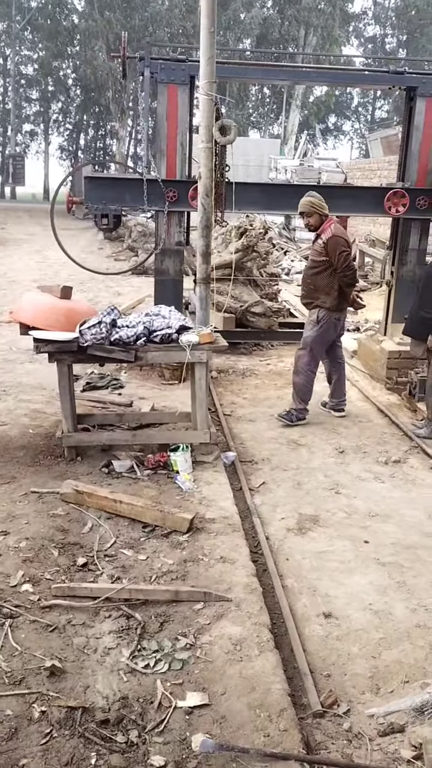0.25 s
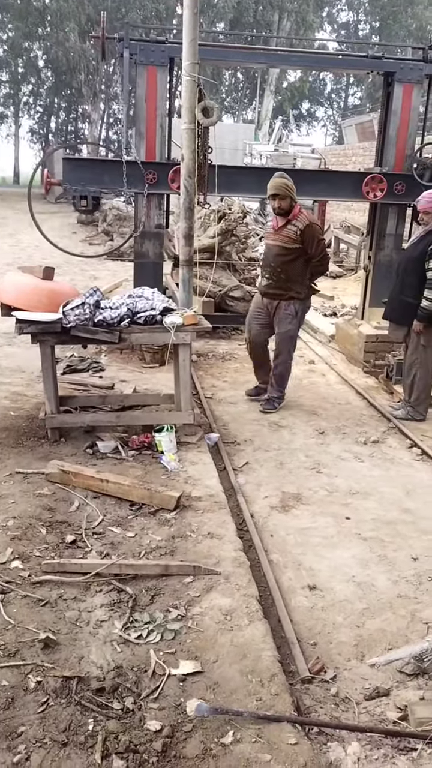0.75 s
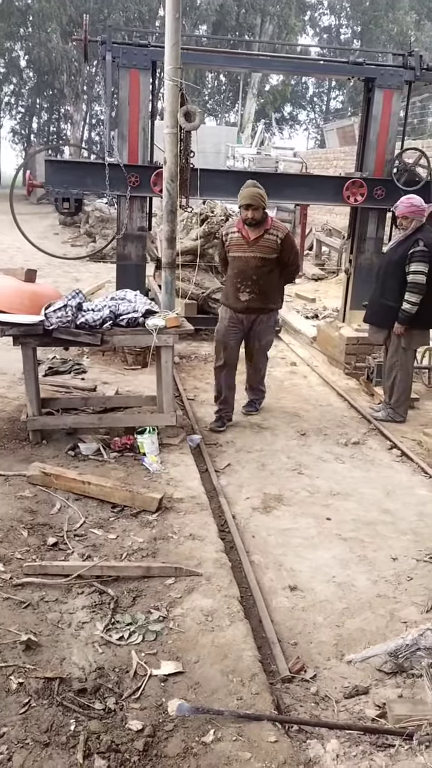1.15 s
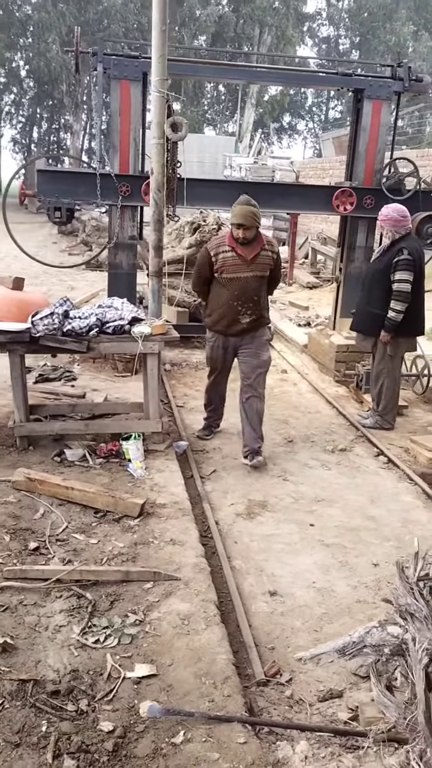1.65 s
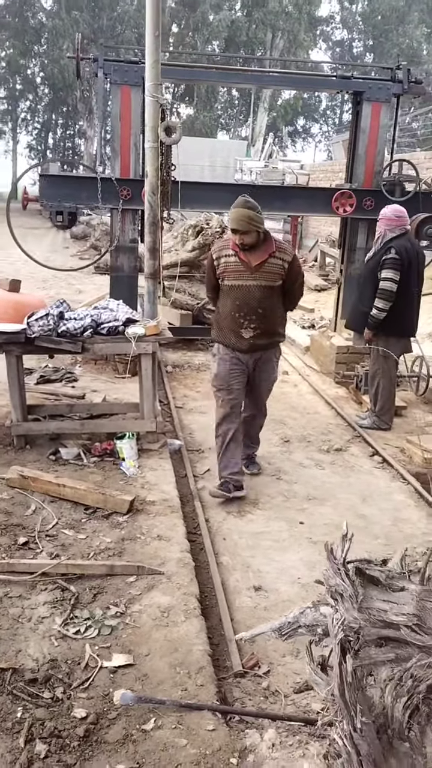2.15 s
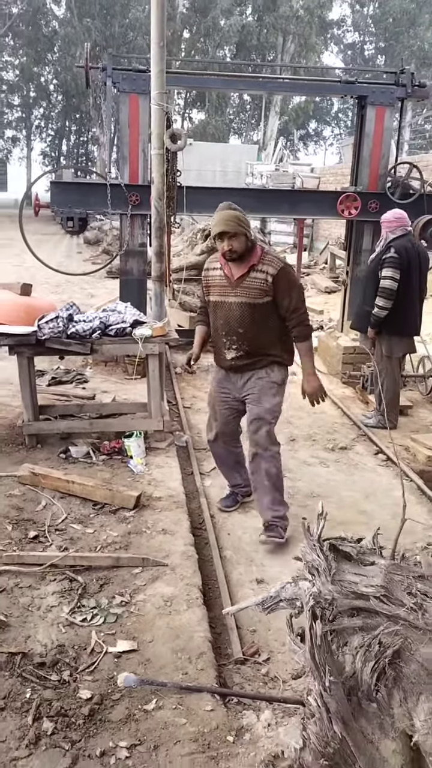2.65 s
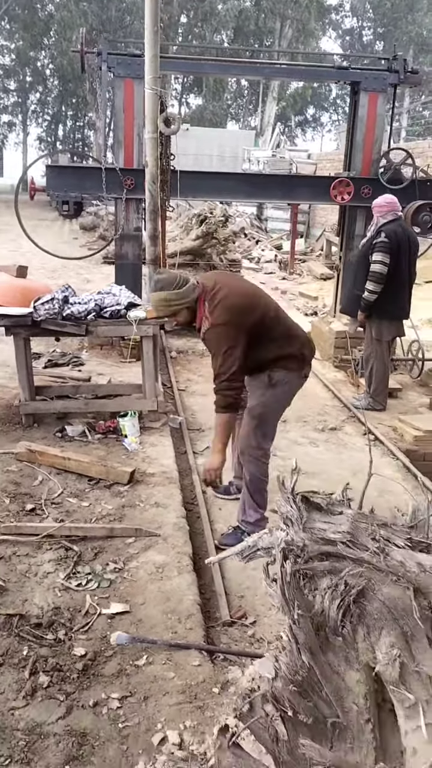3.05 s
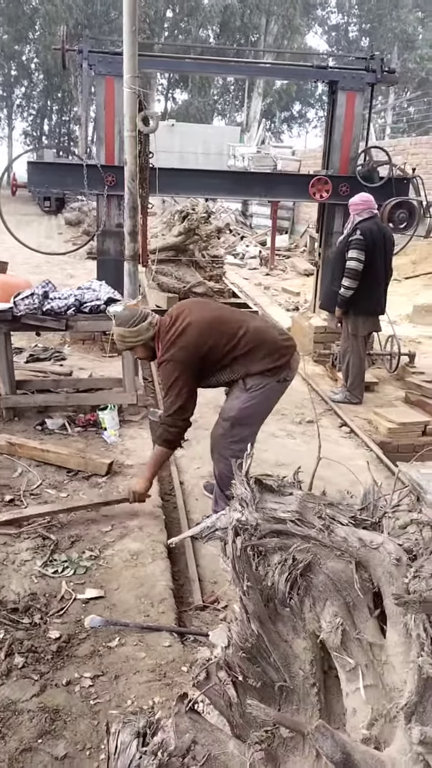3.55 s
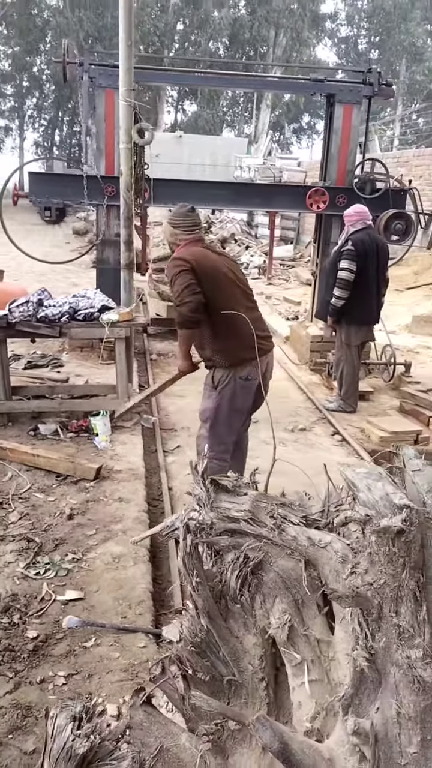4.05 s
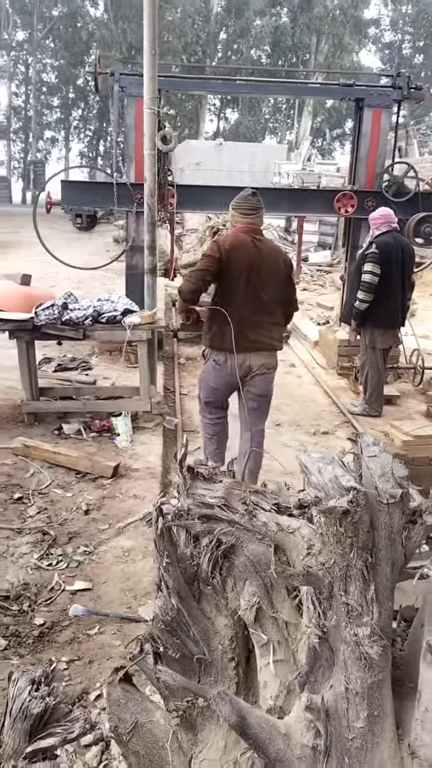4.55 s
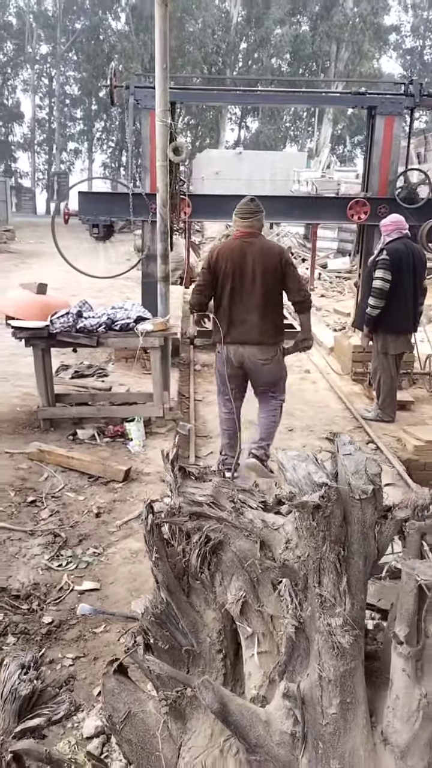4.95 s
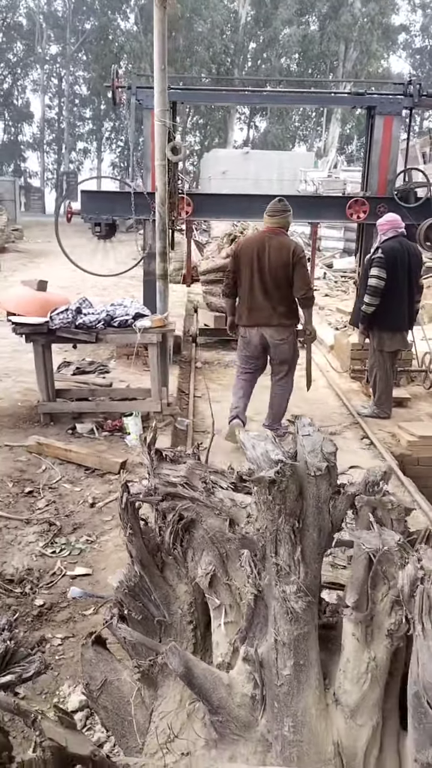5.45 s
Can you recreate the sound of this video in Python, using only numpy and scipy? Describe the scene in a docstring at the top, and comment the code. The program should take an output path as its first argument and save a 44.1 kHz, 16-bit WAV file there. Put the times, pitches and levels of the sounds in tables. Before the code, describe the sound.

Continuous wavering high-pitched screech of a sawmill blade tearing wood outdoors, with groaning metal frame and a slow engine thudding low behind.

```python
"""In an open yard, a horizontal band saw works through a log, mostly to the left of a stereo microphone.
Teeth tear the wood (bands of noise) and shake the blade, which squeals in many wavering modes (noise-driven
resonances). The steel frame whines, groans, rattles and rumbles in the same ways. Behind it a slow
one-cylinder engine thumps through its exhaust pipe (kicks into ringing filters) and a wheel hums (sines)."""
import sys
import numpy as np
from scipy import signal
from scipy.io import wavfile

SR = 44100
rng = np.random.default_rng(int(sys.argv[2]) if len(sys.argv) > 2 else 0)


def log_audio(samples):
    """Write samples as a 16-bit WAV file to the path given in sys.argv[1]."""
    # one column per channel
    frames = np.atleast_2d(samples).T
    # limit to full scale, then quantise
    limited = np.clip(frames, -1, 1)
    pcm = np.round(limited * 32767).astype(np.int16)
    wavfile.write(sys.argv[1], SR, pcm)


N = 250929  # length [samples]


def from_db(db):
    """Turn decibels into an amplitude factor."""
    return 10 ** (np.asarray(db) / 20)


def rms_one(x):
    """Scale a signal to an rms of 1."""
    return x / np.sqrt(np.mean(np.abs(x) ** 2) + 1e-20)


def mid_one(pair):
    """Scale a stereo pair so that the average of left and right has an rms of 1."""
    return pair / np.sqrt(np.mean(pair.mean(axis=0) ** 2) + 1e-20)


def in_time(rows):
    """Draw straight lines between the rows of a table whose first column is time."""
    time_s, *columns = np.transpose(rows)
    return [np.interp(np.arange(N) / SR, time_s, column) for column in columns]


def at_hz(points, hz):
    """Read a (pitch, value) table at any pitch, with straight lines on a log pitch scale."""
    table = np.array(points)
    return np.interp(np.log(hz), np.log(table[:, 0]), table[:, 1])


def drift(rate_hz):
    """Slow random wander with a spread of 1: coarse noise through two one-pole low-passes."""
    step = 40  # samples between coarse points
    r = np.exp(-2 * np.pi * rate_hz * step / SR)
    noise = rng.standard_normal(N // step + 2002)
    slow = signal.lfilter([1], [1, -2 * r, r * r], noise)[2000:]  # drop the filter's start-up
    return np.interp(np.arange(N) / step, np.arange(len(slow)), rms_one(slow))


# How alike left and right are: (pitch [Hz], likeness [0 to 1])
LIKENESS = [(60, 0.99), (180, 0.84), (320, 0.93), (550, 0.38), (1650, 0.064), (4970, 0.015), (15000, 0.039)]
# How much louder left is than right: (pitch [Hz], left minus right [dB])
LEAN = [(60, 0.5), (300, 0.5), (700, 1.5), (1300, 3), (2200, 7.5), (2900, 0.5), (3500, 8), (4100, -0.5),
        (4800, 16), (5600, 5.5), (6400, 16), (7200, -7), (8300, -10), (10000, 2), (15000, -0.5)]


def stereo(mid, side, hz):
    """Mix two unrelated signals so that left and right are as alike and as uneven as at this pitch."""
    alike = np.clip(at_hz(LIKENESS, hz), 0, 1)
    lean_db = at_hz(LEAN, hz)
    pair = np.sqrt(1 + alike) * mid + np.sqrt(1 - alike) * side * [[1], [-1]]
    return pair * from_db([[lean_db / 2], [-lean_db / 2]])


def banded_noise(spectrum, patchy_db, shared):
    """Noise in bands about a third of an octave wide, each with its own flicker on top of a shared one."""
    low_hz, high_hz = spectrum[0][0], min(spectrum[-1][0], .45 * SR)
    edges = np.geomspace(low_hz, high_hz, round(3 * np.log2(high_hz / low_hz)) + 1)
    white = rng.standard_normal((2, 2, N))
    out = 0
    for k, (low, high) in enumerate(zip(edges, edges[1:])):
        band = signal.butter(2, [low, high], "band", fs=SR, output="sos")
        mid, side = signal.sosfilt(band, white[k % 2])  # neighbouring bands use separate noise
        hz = np.sqrt(low * high)
        level_db = at_hz(spectrum, hz) + patchy_db * (shared + drift(12.6))
        out = out + from_db(level_db) * stereo(mid, side, hz)
    return mid_one(out)


MODE_LIKENESS = 0.55  # a single mode reaches both channels at least this much alike


def resonance(hz, width_hz):
    """Noise-driven tone of wandering height and phase, mean square 2 over both channels; hz may move."""
    step = 16  # samples between coarse points
    r = np.exp(-np.pi * np.clip(width_hz, 5, 600) * step / SR)
    draw = rng.standard_normal((2, 2, N // step + 402))
    noise = draw[0] + 1j * draw[1]
    left, other = signal.lfilter([1], [1, -2 * r, r * r], noise)[:, 400:]  # drop the start-up
    centre_hz = np.mean(hz)
    near = np.clip(at_hz(LIKENESS, centre_hz), 0, 1)
    alike = np.clip(max(near, MODE_LIKENESS), 0, 1)
    # each mode has its own phase between left and right
    lag = np.exp(1j * np.pi * (1 - near) * rng.uniform(-0.8, 0.8))
    right = alike * lag * left + np.sqrt(1 - alike ** 2) * other
    carrier = np.exp(2j * np.pi * np.cumsum(np.broadcast_to(hz, N)) / SR)
    at, grid = np.arange(N) / step, np.arange(len(left))
    pair = np.real([np.interp(at, grid, side) * carrier for side in (left, right)])
    lean_db = at_hz(LEAN, centre_hz)
    pair = pair * from_db([[lean_db / 2], [-lean_db / 2]])
    return pair / np.sqrt(np.mean(pair ** 2) / 2)


def small_modes(spectrum, low_hz, high_hz, count, width_share, flicker_db):
    """A crowd of lesser modes spread in pitch, each gliding, flaring up and fading by itself."""
    pitches = np.geomspace(low_hz, high_hz, count) * (1 + .01 * rng.standard_normal(count))
    out = 0
    for hz in pitches:
        level = from_db(at_hz(spectrum, hz) + flicker_db * drift(10.8)) * np.sqrt(hz)
        gliding = hz * (1 + .01 * drift(4.0))
        out = out + level * resonance(gliding, width_share * hz)
    return mid_one(out)


WAVER_SHARE, WAVER_HZ = 0.005, 5.0  # slow wander of a band's pitch: share of the pitch, rate
JITTER_SHARE, JITTER_HZ = 0.004, 16.0  # quick skips of a band's pitch: share of the pitch, rate
FLUTTER_DB, FLUTTER_HZ = 1.3, 22.0  # quick flutter of a band's level, flaring or not


def flaring(bands, flares, base_db, flicker_db, rise_s):
    """Resonant bands that flicker at rest; each flare lifts the nearest band and pulls it to its own pitch."""
    t = np.arange(N) / SR
    nearest = [np.argmin([abs(np.log(hz / band[0])) for band in bands]) for _, _, hz, _ in flares]
    out = 0
    for k, (rest_hz, width_hz, rest_db) in enumerate(bands):
        power = from_db(base_db + rest_db + flicker_db * drift(6.8)) ** 2
        pull = power * rest_hz
        for (middle_s, length_s, hz, db), owner in zip(flares, nearest):
            if owner == k:
                shape = np.clip((length_s / 2 - np.abs(t - middle_s)) / rise_s + .5, 0, 1)
                lift = (from_db(db) * shape) ** 2
                power, pull = power + lift, pull + lift * hz
        wander = WAVER_SHARE * drift(WAVER_HZ) + JITTER_SHARE * drift(JITTER_HZ)
        pitch = pull / power * (1 + wander)  # the louder part decides the pitch
        flutter = from_db(FLUTTER_DB * drift(FLUTTER_HZ))
        out = out + np.sqrt(power) * flutter * resonance(pitch, width_hz)
    return out


WHEEL_HZ = 28.21  # turns per second
# Wheel hum: (multiple of the turning rate, rms level [dB])
WHEEL_ORDERS = [(4, -58), (7, -61), (8, -65)]


def wheel():
    """A turning wheel hums steadily at multiples of its turning rate."""
    turn = 2 * np.pi * WHEEL_HZ * np.arange(N) / SR
    out = 0
    for order, db in WHEEL_ORDERS:
        out = out + np.sqrt(2) * from_db(db) * np.sin(order * turn + rng.uniform(0, 2 * np.pi))
    return out


FIRING_HZ, FIRST_FIRING_S = 7.424, 0.074  # firings per second, time of the first one heard
ENGINE_DB = -52  # rms level
# Thumps of each firing: (delay [s], relative level [dB])
THUMPS = [(0, -2), (0.0306, 0)]
# Ringing modes of the exhaust pipe: (pitch [Hz], relative level [dB], time to fall by 60 dB [s])
EXHAUST = [(68, -9, 0.4), (94, 7, 0.13), (133, 2, 0.14), (163, -1, 0.2)]


def engine():
    """Every firing sends the same few thumps into the exhaust pipe's modes, a little uneven in strength."""
    # one second of run-in comes first and is cut off at the end
    firings = np.arange(-2, N / SR * FIRING_HZ) / FIRING_HZ + FIRST_FIRING_S + 1
    strength = from_db(rng.normal(0, 2.0, len(firings)))
    kicks = np.zeros(N + 2 * SR)
    for delay_s, level_db in THUMPS:
        kicks[np.round((firings + delay_s) * SR).astype(int)] += from_db(level_db) * strength
    soft = signal.butter(2, 300, fs=SR, output="sos")  # low-pass rounds off the kicks
    kicks = signal.sosfilt(soft, kicks + 1e-18)
    out = 0
    for hz, level_db, t60_s in EXHAUST:
        r = from_db(-60 / (t60_s * SR))
        w = 2 * np.pi * hz / SR
        ring = signal.lfilter([0, np.sin(w)], [1, -2 * r * np.cos(w), r * r], kicks)
        out = out + from_db(level_db) * ring
    return from_db(ENGINE_DB) * rms_one(out[SR:SR + N])


# Machine rumble: (time [s], level [dB])
RUMBLE = [(0.0, -45.5), (0.4, -43.5), (1.0, -43.5), (1.6, -42.5), (2.1, -45.5), (2.6, -44), (3.1, -43),
          (3.4, -41.5), (3.9, -41.5), (4.4, -42), (4.9, -40.5), (5.45, -41.5), (5.69, -38)]
# Tone colour of rumble and rattle: (pitch [Hz], relative level per Hz [dB])
MACHINE = [(25, -34), (60, -14), (90, 4.5), (125, 8.5), (160, 2.5), (250, 4.5), (400, 0.5), (600, 0),
           (900, 2.5), (1400, 2), (2000, 0), (2400, 0), (2650, 2), (2900, -6), (3200, -20)]
# Hollow tones of the frame at rest: (pitch [Hz], resonance width [Hz], level [dB])
FRAME_TONES = [(325.8, 78, -53.5), (386, 110, -54), (515.5, 43, -63), (650, 88, -62.5), (1065, 43, -58),
               (1125, 65, -56.5), (1698, 130, -57.5), (1900, 140, -58)]
# A frame tone swells: (middle time [s], length [s], pitch [Hz], level [dB])
SWELLS = [(0.07, 0.17, 653.4, -43), (0.08, 0.19, 1121, -44.5), (0.25, 0.85, 654, -50),
          (0.74, 1.36, 1125, -50), (0.332, 0.24, 1143, -43.5), (0.37, 0.1, 2030, -42.5),
          (0.454, 0.08, 323, -43), (0.617, 0.063, 673, -45), (0.712, 0.3, 388.4, -40),
          (0.776, 0.21, 1123, -40), (0.999, 0.076, 505.5, -41.5), (1.077, 0.066, 500, -38.5),
          (1.02, 0.12, 780, -48), (1.054, 0.29, 430.5, -41.5), (1.048, 0.13, 1697, -43.5),
          (1.107, 0.42, 1125, -45.5), (1.337, 0.0813, 391.7, -40.5), (1.414, 0.13, 1120, -41),
          (1.538, 0.099, 378.3, -42), (1.672, 0.065, 1096, -43.5), (1.714, 0.089, 1650, -40.5),
          (1.8, 0.15, 385, -38), (1.795, 0.086, 321, -42), (1.942, 0.095, 495, -45),
          (1.984, 0.16, 385, -40), (1.973, 0.15, 1115, -43), (2.125, 0.062, 1690, -42),
          (3.089, 0.063, 340, -45.5), (2.406, 0.51, 1686, -46), (2.896, 0.51, 1061, -49.5),
          (3.146, 0.07, 1622, -37.5), (3.218, 0.091, 1659, -42), (3.398, 0.44, 1715, -43.5),
          (3.917, 0.2, 1984, -41), (3.259, 0.15, 330, -46), (4.024, 0.1, 530, -45),
          (4.487, 0.1126, 530, -43.5), (4.735, 0.165, 531.7, -47.5), (5.297, 0.42, 758, -48.5),
          (2.201, 0.31, 762, -50), (3.508, 0.15, 323.8, -46), (3.801, 0.057, 412, -45.5),
          (4.212, 0.063, 319.5, -42.5), (3.82, 0.16, 1117, -42), (3.946, 0.57, 1712, -42.5),
          (4.013, 0.09, 381.6, -48.5), (4.467, 0.29, 1722, -42.5), (4.459, 0.21, 707, -44),
          (4.677, 0.19, 1712, -45.5), (4.506, 0.087, 339.4, -43.5), (4.642, 0.096, 395.3, -40),
          (5.019, 0.086, 334, -47.5), (5.386, 0.06, 364, -43.5), (4.709, 0.091, 1043, -37.5),
          (4.71, 0.12, 1900, -49), (4.883, 0.098, 1138, -39), (5.078, 0.13, 1112, -40.5),
          (5.38, 0.13, 1153, -40.5), (5.621, 0.11, 1190, -45), (5.018, 0.18, 1059, -39),
          (5.188, 0.14, 1836, -40.5), (5.208, 0.86, 1040, -44), (5.21, 1.23, 333.6, -50),
          (5.36, 0.11, 1054, -37.5), (5.476, 0.056, 365.3, -43.5), (5.488, 0.072, 1158, -34.5),
          (5.626, 0.13, 1863, -38.5), (5.666, 0.13, 1065, -39)]
# Steady frame modes: (pitch [Hz], resonance width [Hz], level [dB])
FRAME_MODES = [(264, 14, -61.5), (528.6, 14, -57), (1400, 83, -75), (1917, 45, -57), (2170, 120, -55.5),
               (2390, 92, -53)]
RATTLE_DB = 1.5  # rattle relative to rumble
SWELL_RISE_S = 0.0404  # a swell comes, and goes, within this time


def frame():
    """Shaken steel: groaning tones that swell, steady-pitched modes and a bed of rattle and rumble."""
    rumble_db = in_time(RUMBLE)[0]
    rumble = from_db(rumble_db) * banded_noise(MACHINE, patchy_db=3.0, shared=0.4 * drift(14.0))
    crowd = small_modes(MACHINE, 450, 3150, count=33, width_share=0.04, flicker_db=5.0)
    rattle = from_db(rumble_db + RATTLE_DB) * crowd
    tones = flaring(FRAME_TONES, SWELLS, 0, flicker_db=2.5, rise_s=SWELL_RISE_S)
    steady = 0
    for hz, width_hz, db in FRAME_MODES:
        steady = steady + from_db(db + 3.5 * drift(3.4)) * resonance(hz, width_hz)
    return rumble + rattle + tones + steady


# Thin whines of blade and frame: (start [s], end [s], pitch [Hz], resonance width [Hz], level [dB])
WHINES = [(0.0, 1.75, 3470, 90, -39), (1.9, 3.3, 3519, 45, -41), (2.3, 3.35, 5185, 40, -39),
          (3.3, 5.69, 3530, 50, -45), (3.6, 4.7, 1705, 40, -48), (5.1, 5.69, 1900, 90, -45),
          (2.1, 4.5, 4500, 90, -41), (0.0, 2.1, 4530, 110, -46), (3.3, 5.69, 2375, 50, -50),
          (0.0, 2.0, 2320, 70, -53), (3.4, 4.5, 5250, 50, -40), (3.4, 4.5, 4690, 50, -41),
          (3.0, 5.69, 5569, 14, -45), (2.4, 5.69, 6730, 30, -55), (2.4, 5.69, 7227, 20, -58),
          (2.0, 3.4, 6125, 40, -53)]
WHINE_RISE_S = 0.15  # fade time, centred on each start and end


def whines():
    """Each narrow resonance fades in, holds its pitch while its level flickers, and fades out."""
    t = np.arange(N) / SR
    out = 0
    for start_s, end_s, hz, width_hz, db in WHINES:
        fade = np.clip(np.minimum(t - start_s, end_s - t) / WHINE_RISE_S + .5, 0, 1)
        out = out + from_db(db + 2.5 * drift(6.5)) * fade * resonance(hz, width_hz)
    return out


def squeal(modes, bite):
    """Each blade mode is caught and let go by the wood on its own, and its pitch wavers with blade tension."""
    out = 0
    for hz, width_hz, level_db in modes:
        wavering = hz * (1 + 0.006 * drift(4.0))
        level = from_db(level_db + 2.9 * drift(17.0) + .5 * bite)
        out = out + level * resonance(wavering, width_hz)
    return mid_one(out)


# The cut: (time [s], lower blade modes [dB], upper blade modes [dB], tearing [dB], dust hiss [dB])
CUT = [(0.0, -37, -45.5, -40.5, -55), (0.4, -38.5, -40, -40, -53), (0.95, -35.5, -42.5, -43, -50),
       (1.68, -38.5, -40, -41, -52.5), (1.9, -39.5, -38.5, -37, -47.5), (2.25, -40, -35, -36.5, -45.5),
       (2.5, -41, -35.5, -35.5, -47), (2.75, -49, -32.5, -38, -49), (3.05, -41, -35, -38.5, -46),
       (3.25, -37.5, -36.5, -39, -43), (3.5, -36.5, -33, -38, -41), (3.76, -34.5, -41, -36, -39),
       (3.88, -36, -33, -34.5, -40), (3.98, -40.5, -35.5, -37, -42), (4.25, -49, -30, -37, -46.5),
       (4.4, -36, -35.5, -36.5, -42), (4.55, -42.5, -34.5, -37.5, -46.5), (4.9, -42.5, -30.5, -37.5, -42.5),
       (5.26, -40, -33.5, -35.5, -43), (5.55, -36.5, -38.5, -37.5, -40), (5.69, -32.5, -37, -40.5, -41.5)]
# Lower and upper blade modes: (pitch [Hz], resonance width [Hz], relative level [dB])
LOWER_MODES = [(3265, 520, 21), (3763, 100, 16.5), (3520, 72, 11.5), (3730, 45, 7), (3716, 150, 22),
               (3940, 28, 8)]
UPPER_MODES = [(4210, 130, 21), (4380, 40, 16), (4760, 150, 16), (4890, 130, 20), (5120, 43, 15.3),
               (4620, 68, 14), (5060, 93, 1.6), (5480, 74, 1.9), (5140, 65, 5.3), (5810, 420, 0.5)]
# Tone colour of tearing wood and of flying dust: (pitch [Hz], relative level per Hz [dB])
TEARING = [(1650, -44), (2800, 13.5), (3090, 25), (3480, -35.5), (3970, -4), (4630, -48), (5260, 11.5),
           (6530, 3.5), (7500, -0.5), (8300, -2.5), (9260, -4.5), (10300, -7), (11000, -50)]
DUST = [(8600, -14), (9400, 0.5), (10300, -3), (11700, 2.5), (13000, -7), (14300, -5), (15600, -8)]
# Squealing bands of the blade at rest:
# (pitch [Hz], resonance width [Hz], level against the average of the two blade-mode levels plus 1 dB [dB])
SQUEAL_BANDS = [(3240, 32, -18), (3386, 95, -10), (3575, 155, -8.5), (3670, 140, -17), (3986, 187, -5.5),
                (4230, 95, -29), (4396, 100, -10.5), (4600, 43, -14.5), (4720, 110, -8), (4840, 55, -15),
                (5080, 73, -10), (5210, 82, -10), (5380, 59, -13.5), (5670, 28, -28.5), (5786, 44, -9.5),
                (5990, 57, -16.5), (6970, 49, -32)]
# The wood grips the blade and a band squeals up: (middle time [s], length [s], pitch [Hz], level [dB])
SQUEALS = [(0.199, 0.27, 3480, -33.5), (0.359, 0.072, 3400, -24), (0.504, 0.11, 3370, -36),
           (0.912, 0.14, 3473, -31.5), (0.915, 0.13, 5080, -38.5), (0.975, 0.22, 4670, -36.5),
           (1.025, 0.13, 5470, -35.5), (1.187, 0.11, 3520, -34.5), (1.273, 0.11, 4720, -30.5),
           (1.34, 0.1, 4620, -34), (1.372, 0.11, 3305, -31), (1.331, 0.19, 3520, -38.5),
           (1.487, 0.11, 3647, -31.5), (1.508, 0.049, 5930, -36), (1.663, 0.085, 3380, -34.5),
           (2.234, 0.2, 4760, -35), (2.257, 0.16, 3405, -34.5), (2.283, 0.069, 5120, -35),
           (2.483, 0.25, 3530, -37.5), (2.71, 0.24, 4720, -33), (2.711, 0.19, 5120, -32.5),
           (2.842, 0.18, 3520, -33.5), (3.061, 0.27, 4884, -37), (2.548, 0.17, 4760, -37),
           (2.931, 0.23, 5300, -35), (3.038, 0.27, 4410, -37), (3.051, 0.2, 4970, -33.5),
           (3.093, 0.082, 5400, -31), (2.671, 0.12, 4600, -40), (2.592, 0.16, 5040, -31.5),
           (3.217, 0.22, 5250, -35), (3.451, 0.23, 5480, -35.5), (0.758, 0.43, 3400, -38.5),
           (3.17, 0.1, 3576, -32.5), (3.397, 0.12, 3570, -30.5), (3.406, 0.093, 4900, -32),
           (3.58, 0.21, 5210, -38), (3.611, 0.29, 4720, -32), (3.807, 0.17, 5255, -32),
           (3.835, 0.19, 3970, -39), (3.986, 0.23, 4720, -35.5), (3.953, 0.12, 5390, -34.5),
           (4.044, 0.16, 5560, -32.5), (4.18, 0.13, 4600, -38), (4.196, 0.18, 4230, -38),
           (4.194, 0.1, 5120, -31), (4.374, 0.17, 4720, -33), (4.408, 0.14, 5380, -32),
           (4.428, 0.17, 3664, -35), (4.66, 0.062, 3693, -28.5), (4.786, 0.16, 6020, -36),
           (4.813, 0.1, 3670, -30.5), (4.754, 0.14, 5060, -37.5), (4.88, 0.29, 5000, -35.5),
           (4.991, 0.17, 4600, -37.5), (5.081, 0.059, 3540, -25), (5.151, 0.25, 5380, -35.5),
           (5.21, 0.061, 6080, -30), (5.292, 0.25, 3960, -32), (5.26, 0.1, 3470, -36),
           (5.396, 0.14, 3330, -35), (5.441, 0.088, 3930, -36.5), (4.703, 0.19, 4600, -52.5),
           (5.434, 0.097, 5270, -37.5), (5.623, 0.11, 4764, -33.5)]
SQUEAL_RISE_S = 0.0892  # a squeal comes, and goes, within this time
SCRAPE_DB = 3.5  # scraping modes relative to tearing
CUTTING_LOW_HZ = 3400  # blade modes, tearing and scraping are high-passed here
SQUEAL_LOW_HZ = 3170  # the flaring squeals are high-passed here


def blade():
    """Squeals, tearing, scraping and dust hiss; the teeth's uneven bite stirs blade modes, tearing and dust."""
    lower_db, upper_db, tearing_db, dust_db = in_time(CUT)
    bite = drift(27.0)
    rest_db = (lower_db + upper_db) / 2 + 1.0
    squeals = flaring(SQUEAL_BANDS, SQUEALS, rest_db, flicker_db=3.0, rise_s=SQUEAL_RISE_S)
    lower = from_db(lower_db) * squeal(LOWER_MODES, bite)
    upper = from_db(upper_db) * squeal(UPPER_MODES, bite)
    tearing = from_db(tearing_db) * banded_noise(TEARING, patchy_db=2.5, shared=0.25 * bite)
    crowd = small_modes(TEARING, 3200, 10000, count=36, width_share=0.035, flicker_db=3.5)
    scrape = from_db(tearing_db + SCRAPE_DB) * crowd
    dust = from_db(dust_db) * banded_noise(DUST, patchy_db=2.0, shared=0.2 * bite)
    bright = signal.butter(6, CUTTING_LOW_HZ, "high", fs=SR, output="sos")
    edge = signal.butter(8, SQUEAL_LOW_HZ, "high", fs=SR, output="sos")
    cutting = signal.sosfilt(bright, lower + upper + tearing + scrape)
    return signal.sosfilt(edge, squeals) + cutting + dust


def scene():
    """Add up all sources, from the background to the blade."""
    return wheel() + engine() + frame() + whines() + blade()


MIC_LOW_HZ, CUTOFF_HZ = 56.4, 15600  # lower and upper limits of the sound


def record(dry):
    """The microphone loses the deep bass; the top is cut steeply."""
    bass_cut = signal.butter(4, MIC_LOW_HZ, "high", fs=SR, output="sos")
    top_cut = signal.ellip(14, .5, 85, CUTOFF_HZ, fs=SR, output="sos")
    return signal.sosfilt(top_cut, signal.sosfilt(bass_cut, dry))


dry = scene()
out = record(dry)
log_audio(out)
```